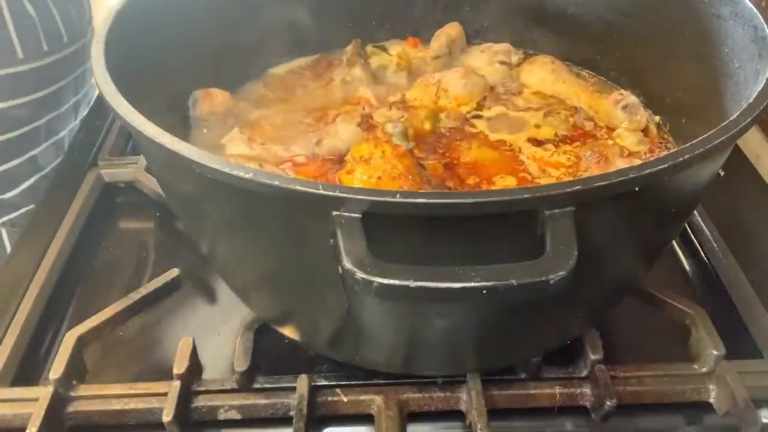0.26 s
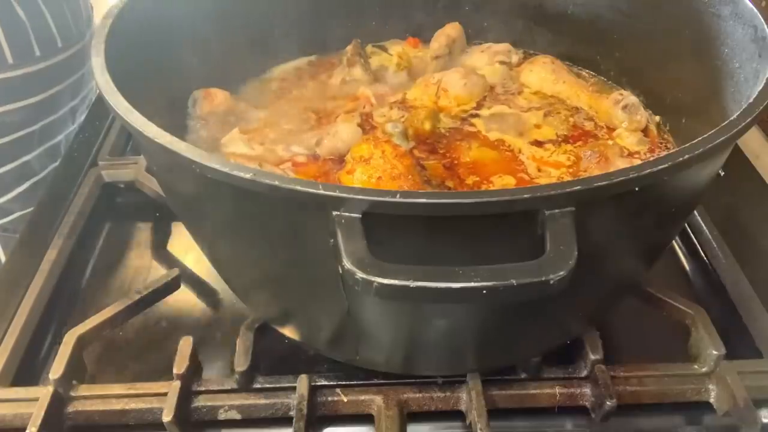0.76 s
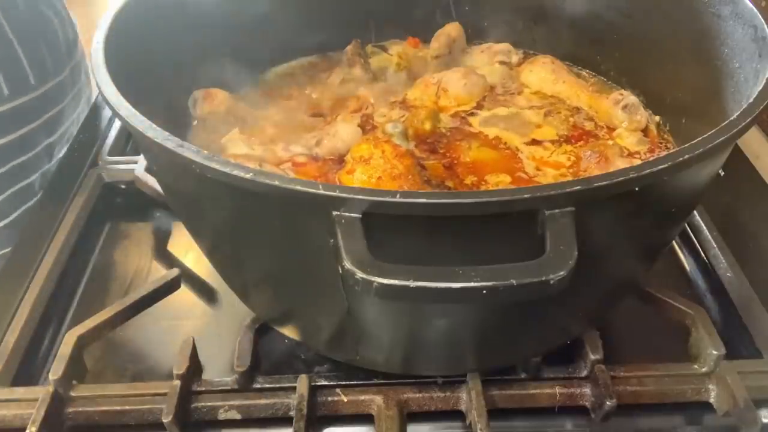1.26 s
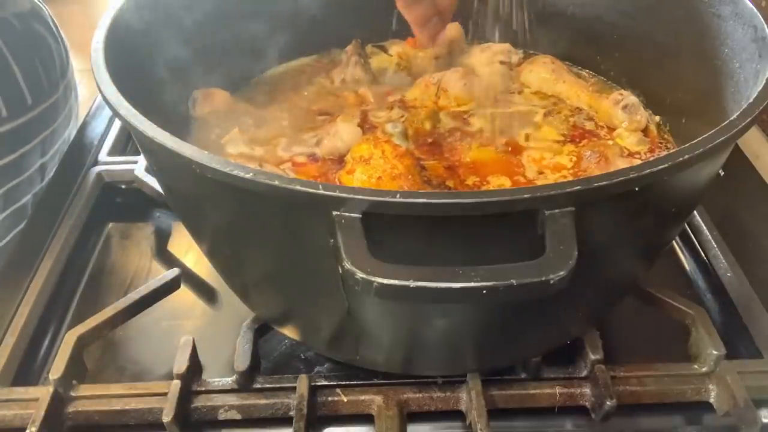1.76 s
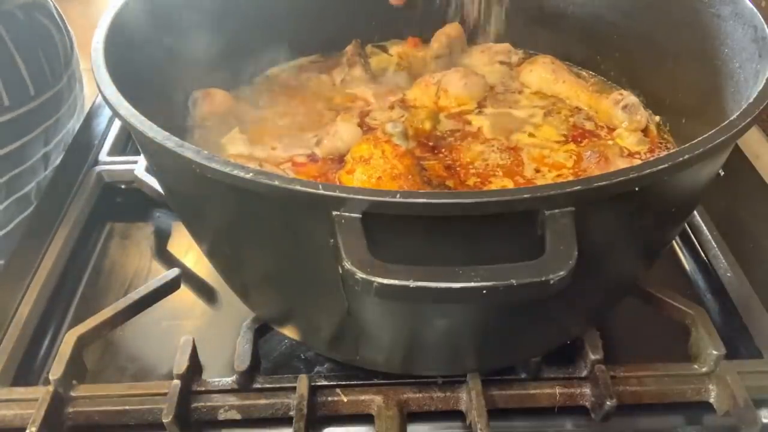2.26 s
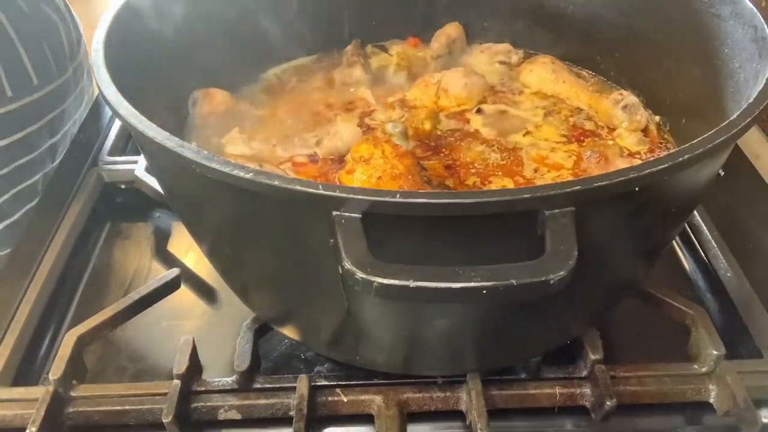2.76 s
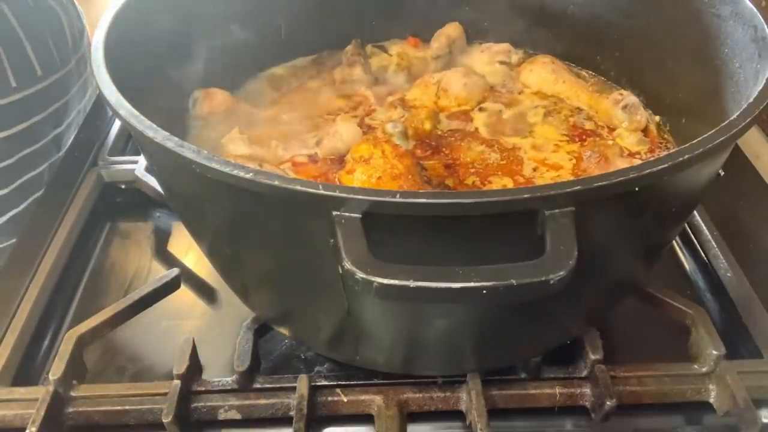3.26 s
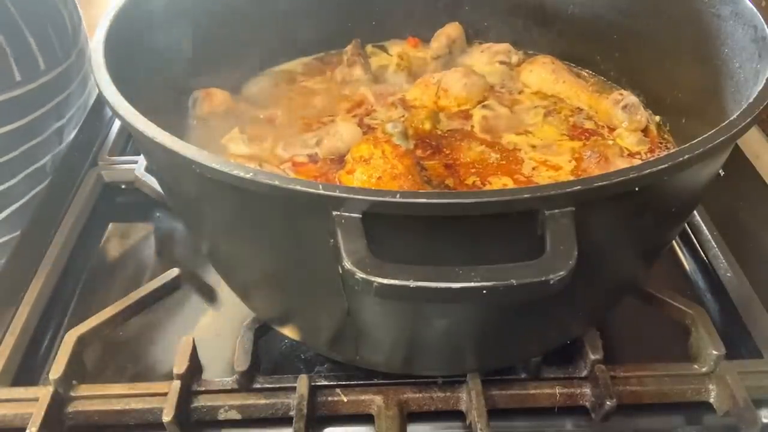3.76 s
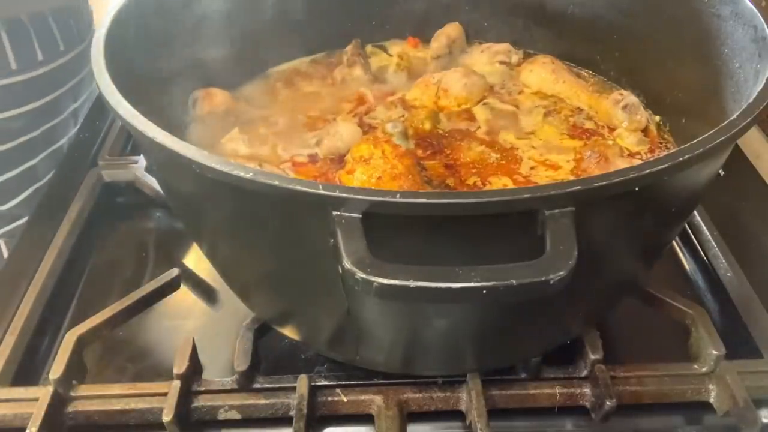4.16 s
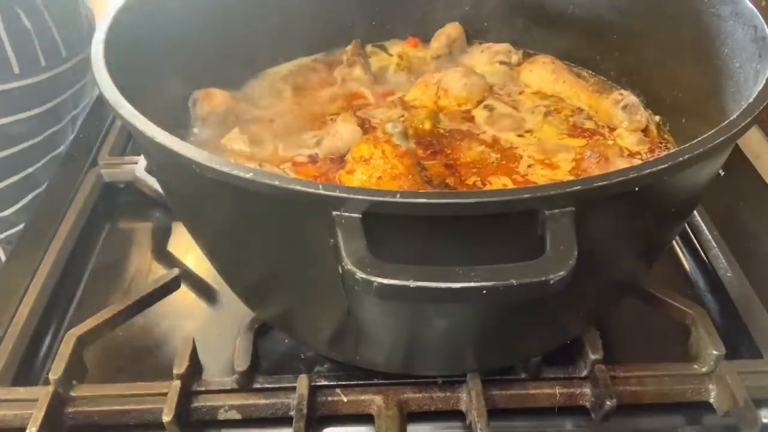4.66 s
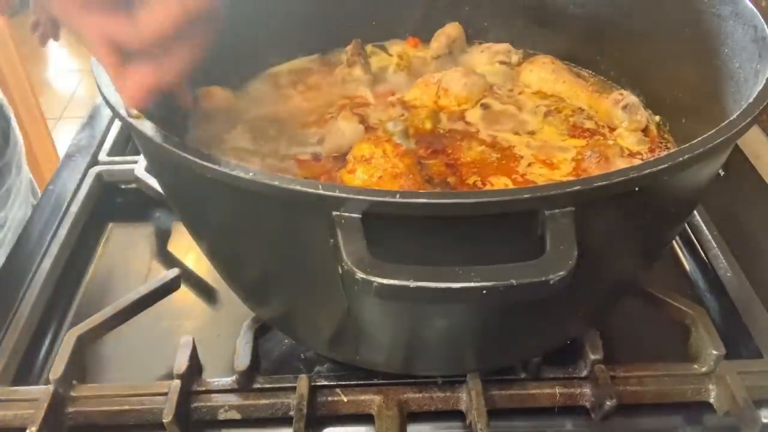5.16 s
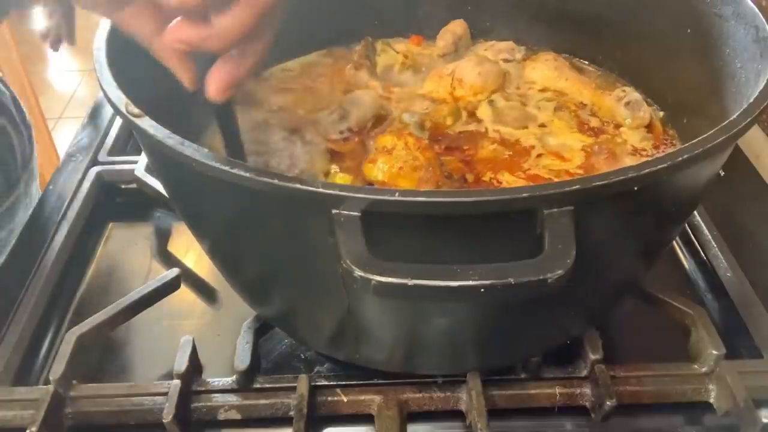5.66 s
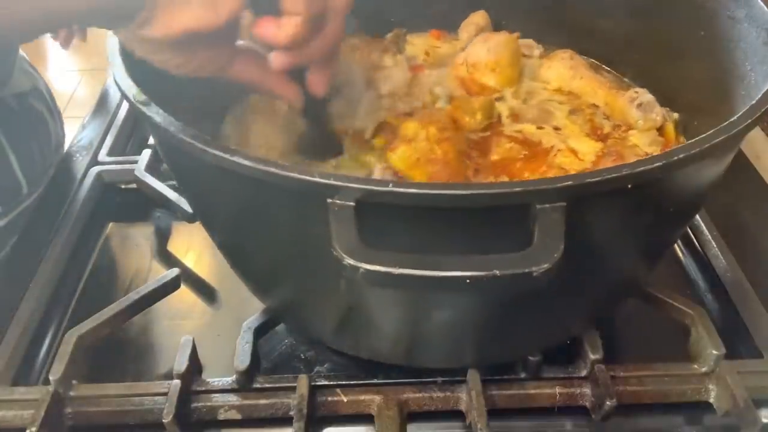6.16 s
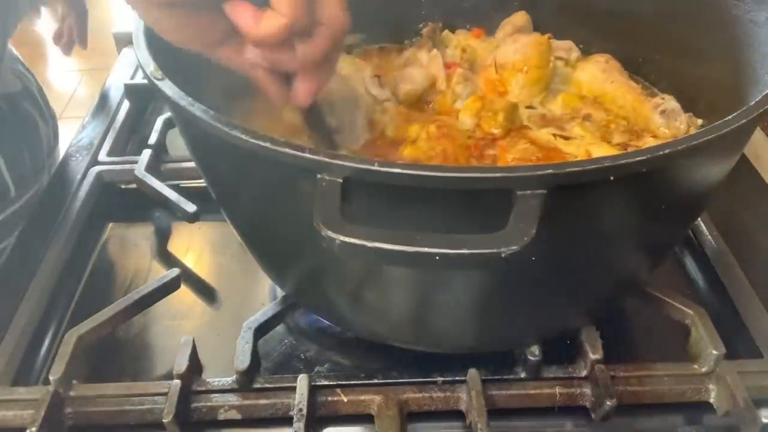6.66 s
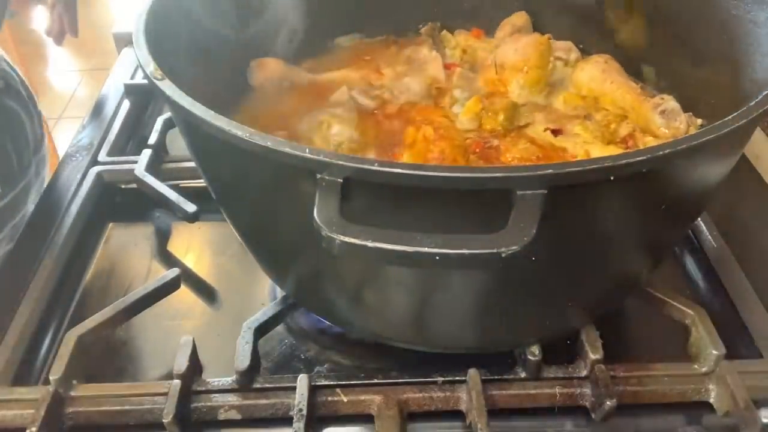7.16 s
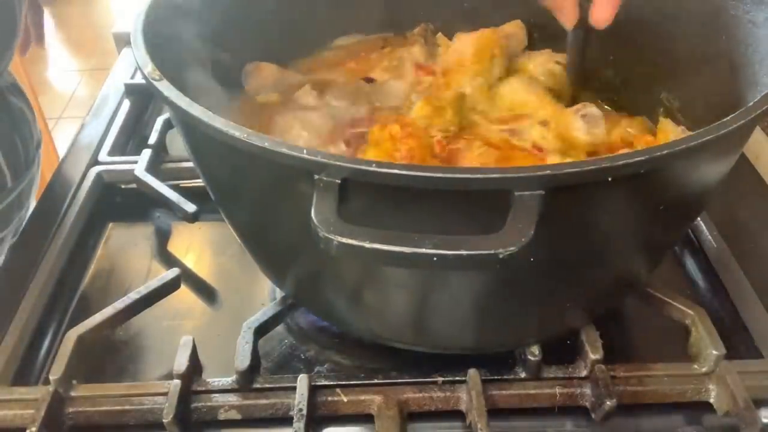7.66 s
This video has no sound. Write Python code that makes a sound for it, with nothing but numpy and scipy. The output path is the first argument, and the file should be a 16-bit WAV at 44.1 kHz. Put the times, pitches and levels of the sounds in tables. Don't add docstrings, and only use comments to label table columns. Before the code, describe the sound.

A close stereo view of a pot of chicken stew on a gas burner in a small kitchen with short echoes. Throughout, gas hisses finely and the flame roars softly and evenly, over low room rumble and a wavering low motor hum. Tiny bubbles crackle faintly, with larger round pops near 0.3, 1.2, 2.2, 3.1 and a busier group from 3.9 to 4.8 s. A very faint tap comes at 0.14 s. At 4.08-4.17 s something is set down: a rapid run of hard contacts, a brief counter ring, a low thump and a rustle. Faint rim ticks come at 5.2 s. From 6.0 s the heavy pot is nudged with low thuds, the handle ticks, and a dull scrape runs 6.15-6.45 s as the noise swells slightly. The sharpest, loudest knock hits at 6.59 s, quickly damped. Small light taps follow at 7.37, 7.48, 7.55 and 7.63 s while the simmer continues.

```python
import sys
import numpy as np
from scipy import signal
from scipy.fft import rfft, irfft
from scipy.io import wavfile
from scipy.ndimage import uniform_filter1d

SR = 44100
rng = np.random.default_rng(int(sys.argv[2]) if len(sys.argv) > 2 else 0)


def generate_wav(sig):
    pcm = np.round(np.clip(np.atleast_2d(sig).T, -1, 1) * 32767).astype(np.int16)
    wavfile.write(sys.argv[1], SR, pcm)


def rack_gain(trim_db):
    fader = np.asarray(trim_db, float)
    return 10 ** (fader / 20)


N = 348831

EDGE_HZ = 15730
COUNTER_LAG_MS, POT_LAG_MS, RIM_LAG_MS = 0.082, 0.27, 0.06


def evened(x):
    return x / np.sqrt(np.mean(abs(x) ** 2) + 1e-20)


def read(points, hz, order=1):
    points = np.array(points)
    return np.interp(np.log(hz + 1), np.log(points[:, 0] + 1), points[:, order])


def add(mix, s, sound):
    part = mix[max(round(s * SR), 0):][:len(sound)]
    part += sound[:len(part)]


def place(mix, s, sound, pan_db, lag_ms):
    add(mix[0], s + lag_ms / 1000, sound * rack_gain(pan_db / 2))
    add(mix[1], s, sound * rack_gain(-pan_db / 2))


def drift(t, top_hz):
    waves = [np.sin(2 * np.pi * (f * t + rng.random())) / np.sqrt(f) for f in np.geomspace(.3, top_hz, 24)]
    return evened(sum(waves))


# f/Hz, in-phase share (leans left), quarter-turn share (arrival lag)
LINK = [(40, .25, -0.1), (125, -0.56, 0.31), (215, 0.054, 0.083), (302, 0.66, -0.38), (400, -0.052, -0.17),
        (620, -0.1, -0.55), (930, -0.11, -0.68), (1260, -0.35, -0.082), (1500, -0.22, 0.0052),
        (1700, -0.61, -0.025), (2120, -.25, 0.63), (2500, -0.27, .15), (3060, -0.15, 0), (3620, -0.52, -.5),
        (4300, -0.14, 0.33), (5200, .1, 0.46), (6000, -0.12, -.1), (7000, .4, 0.47), (7300, .1, 0.91),
        (8500, 0, 0), (9900, 0.12, 0), (10700, 0, -.6), (13000, 0, -0.54)]
# f/Hz, width/Hz, mid lift/dB, side lift/dB
HOLLOWS = [(980.6, 22, 10, 1), (1554, 43, 5, 4), (1724, 35, 6, 4), (2720, 67, 1.5, 7), (292.5, 49, -5, 1),
           (3633, 31, 11, 5), (3670, 64, 2, 6), (3823, 39, 9, 5), (3890, 90, -4, 1), (4320, 80, 5.5, 7),
           (2185, 22, 5, 3), (2850, 27, 4.5, 2), (6100, 59, 6, -4), (4950, 210, 3.5, 4),
           (5880, 100, 4.5, 2), (7100, 120, -1, -5), (7185, 165, 6, 3.5), (8650, 120, 0, 3),
           (9150, 210, 9, -2), (5500, 100, -5.5, 0), (5330, 200, 2.5, 0), (5750, 120, 2, 0),
           (9900, 250, 6, 1), (10230, 120, -4, 1), (6285, 50, 6, 0), (6930, 90, 4, 0),
           (13210, 170, 4.5, -1), (13560, 200, -4, 0), (13800, 130, 6, 0), (11540, 68, 6.5, -8),
           (14500, 100, 2, 0)]
# f/Hz, mid change/dB
SHIFTED = [(5000, 0), (5500, -1), (6000, 0), (7400, 0), (8100, 3.5), (8600, 0), (10000, 2.5), (10300, -3),
           (10550, -9), (10850, -7.5), (11250, 2), (11600, 0)]
SHIFT_S = (6.1, 6.4)
STIR_S, STIR_WIDTH_S = 6.2, 0.21


def steady(layer, control, follow, stir_db, size, patchy_db, flicker_db):
    mid, side, mid_db, side_db = layer
    hop = size // 4
    hz = np.fft.rfftfreq(size, 1 / SR)
    t = np.arange(N // hop + 5) * hop / SR
    a, b, c, d, patches = rng.standard_normal((len(t), len(hz), 5)).T
    shared, separate = a + 1j * b, c + 1j * d

    patches = uniform_filter1d(patches, 8, 0)
    patches = evened(uniform_filter1d(patches, 10, 1))
    flow = follow * np.interp(t, *np.transpose(control))
    flow = flow + stir_db * np.exp(-((t - STIR_S) / STIR_WIDTH_S) ** 2)
    field = rack_gain(patchy_db * patches + flicker_db * drift(t, 27) + flow - flow.mean())

    lift = sum(np.outer(db, 1 / (1 + (2 * (hz - f) / width) ** 2)) for f, width, *db in HOLLOWS)
    shift = np.outer(read(SHIFTED, hz), np.interp(t, SHIFT_S, [0, 1]))
    mid_gain = rack_gain((read(mid, hz) + lift[0])[:, None] + shift)
    side_gain = rack_gain(read(side, hz) + lift[1])[:, None]

    link = (read(LINK, hz) + 1j * read(LINK, hz, order=2))[:, None]
    tied = link * shared + np.sqrt(np.clip(1 - abs(link) ** 2, 0, 1)) * separate
    inside = ((hz > mid[0][0]) & (hz < mid[-1][0]))[:, None]
    z = inside * field * [mid_gain * shared, side_gain * tied]
    m, s = signal.istft(z, nperseg=size, noverlap=size - hop)[1][:, :N]
    m, s = rack_gain(mid_db) * evened(m), rack_gain(side_db) * evened(s)
    return np.array([m + s, m - s])


# mid curve (f/Hz, level/dB per Hz), side curve (the same), mid rms/dB, side rms/dB
RUMBLE = [(15, -26), (25, -9), (49, -2.5), (75, -15), (113, -4.5), (146, -10.5), (177, -5), (228, -18.5),
          (269, -5.5), (286, -6), (301, -6), (313, -5.5), (325, -27), (369, -15.5), (520, -26), (680, -34),
          (1140, -120)], [(15, -40), (25, -39), (102, -5), (144, -9), (219, -6), (269, -17), (294, -1),
          (325, -7.5), (520, -11), (680, -54), (1140, -120)], -45.5, -56
# t/s, level/dB
DRAUGHT = [(0.0, -49), (0.75, -48), (3.92, -47.5), (4.14, -47), (4.58, -46.5), (5.76, -48), (6.07, -48.5),
           (6.23, -47), (6.49, -46), (6.69, -50), (7.17, -48), (7.9, -43)]


def rumble():
    return steady(RUMBLE, DRAUGHT, follow=0.44, stir_db=0.5, size=4096, patchy_db=1.0, flicker_db=-0.5)


# mid curve (f/Hz, level/dB per Hz), side curve (the same), mid rms/dB, side rms/dB
ROAR = [(260, -3), (450, -15), (623, -2.5), (705, -2), (863, -0.5), (1070, -3.5), (1270, -4), (1680, 0.5),
        (1810, -3.5), (2120, -3.5), (3070, -10.5), (3440, -8.5), (3680, -6.5), (4030, -13.5), (6600, -16.5),
        (8580, -62), (14500, -120)], [(260, -45), (450, -8), (576, -7), (638, 2), (854, -5.5), (988, 4),
        (1200, -8), (1640, 0.5), (1770, -8), (2070, -1), (2460, -6.5), (3040, -10), (3720, -7.5),
        (4450, -15), (6600, -5.5), (8580, -28), (14500, -120)], -51, -51
# t/s, level/dB
FLAME = [
    (0.0, -48.5),
    (2.27, -49),
    (3.23, -48.5),
    (5.26, -48.5),
    (6.4, -49),
    (7.9, -48.5),
]


def flame_roar():
    return steady(ROAR, FLAME, follow=1.0, stir_db=-0.1, size=2048, patchy_db=1.68, flicker_db=0.0)


# mid curve (f/Hz, level/dB per Hz), side curve (the same), mid rms/dB, side rms/dB
JET = [(3710, -43), (6300, -12), (7050, -9), (7350, -8.5), (7700, -18.5), (7950, -26.5), (8510, -23),
       (8640, -62), (9270, -63), (9410, -42), (9590, -32.5), (10600, -5.5), (11900, -9.5), (13400, 3),
       (15100, -2.5), (15800, -7)], [(3710, -50), (6300, -24), (6600, -15), (7110, -2.5), (7470, 2.5),
       (7850, -12), (8180, -3), (8510, -3), (8920, 3.5), (9310, 2), (10100, -2.5), (12600, -9),
       (13400, -13), (13600, -27), (14000, -29)], -48.5, -50


def jet_hiss():
    return steady(JET, FLAME, follow=1, stir_db=0, size=1024, patchy_db=1.7, flicker_db=.35)


# f/Hz, rms level/dB, left-right/dB, waver/dB
HUMS = [
    (299.2, -50, 3.5, -1.17),
    (43.6, -58, 6, 2.5),
    (200.8, -64.5, -1, 1.5),
]


def hum():
    t, out = np.arange(N) / SR, np.zeros((2, N))
    coarse = t[::200]
    for hz, db, pan_db, waver_db in HUMS:
        turns = hz * t + np.interp(t, coarse, 0.051 * drift(coarse, 3))
        level = np.sqrt(2) * rack_gain(db + waver_db * np.interp(t, coarse, drift(coarse, 2.9)))
        out[0] += level * rack_gain(pan_db / 2) * np.sin(2 * np.pi * turns - .35)
        out[1] += level * rack_gain(-pan_db / 2) * np.sin(2 * np.pi * turns + 0.23)
    return out


def bubble(hz, t60, rise):
    t = np.arange(round(t60 * SR)) / SR
    tone = np.sin(2 * np.pi * hz * t * (1 + rise * t / t60))
    return tone * rack_gain(-60 * t / t60) * (1 - np.exp(-t / 0.00096))


# t/s, peak level/dB, f/Hz
POPS = [(0.235, -37, 1660), (0.304, -39, 995), (1.212, -42, 765), (1.232, -36.5, 850), (1.259, -45, 865),
        (2.012, -47, 982), (2.234, -41, 1590), (3.052, -43, 1000), (3.102, -36, 930), (3.12, -35.5, 970),
        (3.487, -39, 984), (3.723, -37, 1700), (3.941, -41, 710), (4.046, -38, 885), (4.401, -39.5, 904),
        (4.414, -37, 1650), (4.449, -40, 1560), (4.544, -43, 830), (4.584, -33.5, 840), (4.679, -40, 950),
        (4.797, -38.5, 840), (6.374, -40, 830)]
POP_T60_S, POP_PAN_DB, POP_PAN_DB_PER_OCTAVE = 0.039, -3, 1
FAINT_POPS = 320


def simmer():
    out = np.zeros((2, N))
    for s, db, hz in POPS:
        pan_db = POP_PAN_DB + POP_PAN_DB_PER_OCTAVE * np.log2(hz / 1000)
        place(out, s, rack_gain(db) * bubble(hz, POP_T60_S, 0.058), pan_db, 0.21)
    for when, pitch, size, side in rng.random((FAINT_POPS, 4)):
        hz = 650 * 3.2 ** pitch
        level = rack_gain(-54.5 - 4.7 * np.log(np.maximum(size, .1)))
        place(out, when * N / SR, level * bubble(hz, 35 / hz, 0.15), -6 * side, 0.5 * side)
    return out


# t/s, rms level/dB, length/s, centre f/Hz, left-right/dB
BRUSHES = [(0.13, -51, 0.037, 4100, 7), (3.603, -49, 0.087, 4700, 0), (4.086, -40, 0.035, 3400, 2),
           (4.10, -47, 0.06, 800, 4), (6.588, -52, 0.11, 1800, 2), (6.586, -45, .07, 3500, 0),
           (4.115, -46, .085, 1300, 0), (6.147, -55, .06, 2500, -2), (6.357, -48, 0.05, 1000, -4),
           (5.225, -50, .03, 2200, -5), (7.476, -48, .016, 4600, -3), (7.371, -34, .014, 21500, 0)]
BRUSH_SPREAD = 1.9


def brushes():
    out = np.zeros((2, N))
    for s, db, length, hz, pan_db in BRUSHES:
        edges = [hz / BRUSH_SPREAD, min(hz * BRUSH_SPREAD, EDGE_HZ)]
        band = signal.butter(2, edges, "band", fs=SR, output="sos")
        grain = rack_gain(6.0 * rng.standard_normal(6000))
        noise = rng.standard_normal((2, 6000)) * grain
        swish = evened(signal.sosfilt(band, noise))[:, :round(length * SR)]
        swish = swish * np.hanning(swish.shape[1]) * rack_gain(db + np.array([[.5], [-.5]]) * pan_db)
        add(out[0], s, swish[0])
        add(out[1], s, swish[1])
    return out


def struck(contacts, modes, crack_db, lag_ms):
    out, t = np.zeros((2, N)), np.arange(3500) / SR
    hz, mode_db, t60 = np.transpose(modes)[:, :, None]
    soft_start = 1 - np.exp(-t / 0.00028)
    for s, db, bright_db, pan_db in contacts:
        for port in range(2):
            phase = rng.random(hz.shape) * 2.0
            level = rack_gain(mode_db + bright_db * np.log2(hz / 2000) - 60 * t / t60)
            ring = (level * np.sin(2 * np.pi * hz * t + phase)).sum(0)
            crack = rack_gain(crack_db + 2 * bright_db - 60 * t / 0.049) * rng.standard_normal(len(t))
            knock = (ring / abs(ring).max() + crack) * soft_start
            add(out[port], s + (1 - port) * lag_ms / 1000, rack_gain(db + (-1.5 - port) * pan_db) * knock)
    return out


# t/s, peak level/dB, brightness/dB per octave, left-right/dB
SPOON = [(6.5828, -33, 2, -2), (6.5863, -16, 1, -2), (6.5881, -16.5, 0, -2.5), (6.5901, -20, -2, -3),
         (6.5926, -23, -4, 1), (6.5995, -29, 0, -2), (6.6121, -31, 1, -2), (.1371, -36, 3, -3),
         (5.2881, -41, -2, -2), (7.3738, -31, -2, -2), (7.4821, -35, 4, -2), (7.5481, -33, -2, -3),
         (7.6281, -36, 0, -2)]
# f/Hz, level/dB, t60/s
WALL = [(600, -10, .025), (958, -3, .03), (1255, 2, .03), (1560, -11, .02), (2170, -14, .04),
        (2895, 0, .016), (3200, -6, .012), (3490, 0, .014), (3735, -3, .03), (4250, -6, .014),
        (4673, -5, .03), (5200, -9, .02), (6400, -11, .025), (7100, -13, .016), (11500, -15, .01)]


def spoon_taps():
    return struck(SPOON, WALL, -17.0, POT_LAG_MS)


# t/s, peak level/dB, f/Hz, glide factor
PUSHES = [(.24, -38, 170, 0.88), (1.782, -39, 64.6, 1), (3.97, -40.5, 70.5, 1.05),
          (4.075, -37.5, 69.6, 1.1), (4.094, -27.5, 183, 0.84), (4.875, -41, 376, 0.87),
          (4.905, -43, 260, 1), (4.94, -42, 330, 0.83), (5.59, -41, 181, 1.16), (6.015, -28.5, 62.4, 2.03),
          (6.08, -32, 90.6, 1.27), (6.143, -40, 60, 1.2), (6.17, -43, 250, 1), (6.3, -41, 248, 0.86),
          (6.35, -43, 200, 1.1), (6.408, -27.5, 68.5, 0.95), (6.48, -39, 70.5, 0.94),
          (6.575, -34, 64.7, 0.98), (6.588, -32.5, 149, 1.1), (6.607, -38, 60, 0.93),
          (6.62, -37, 140, 1.08), (7.55, -45, 400, 0.68), (7.79, -41, 400, 0.79), (7.81, -38.5, 182, 0.88)]
PUSH_TURNS, PUSH_LEAST_S = 4.9, 0.019


def pushes():
    out = np.zeros(N)
    for s, db, hz, glide in PUSHES:
        length = max(PUSH_TURNS / (hz * np.sqrt(glide)), PUSH_LEAST_S)
        u = np.linspace(0, 1, round(length * SR))
        sway = np.sin(2 * np.pi * np.cumsum(hz * glide ** u) / SR)
        add(out, s, rack_gain(db) * np.sin(np.pi * u) ** 2 * sway)
    return out * rack_gain([[-.8], [.8]]) 


# t/s, peak level/dB, brightness/dB per octave, left-right/dB
SET_DOWN = [(4.0801, -21, 0.5, -1.5), (4.0853, -21, -3.5, -2), (4.0885, -25.5, -1.5, -1.5),
            (4.0918, -19, 1, -1.5), (4.0930, -30, 12, 2), (4.1003, -23.5, -2, -2), (4.1055, -23, 6, -1),
            (4.1105, -21, 2, 2), (4.119, -39, 5, 3), (4.141, -38, 4, -1), (4.129, -36, -2, 1),
            (4.152, -39, 0, 0), (4.168, -37, 0, 0), (4.180, -38, 2, 4)]
# f/Hz, level/dB, t60/s
COUNTER = [(565, -3.5, 0.017), (906, 1, 0.088), (1007, 0.5, 0.079), (1132, -1, 0.082), (1311, -3.5, 0.084),
           (1650, -12, 0.05), (2030, -9.5, 0.04), (2510, -11, 0.019), (2970, -10.5, 0.052),
           (3600, -13, 0.022), (4530, -9, 0.015), (5060, -5, 0.015), (5630, -10, 0.018), (7030, -22, 0.017)]


def set_down():
    return struck(SET_DOWN, COUNTER, -49, COUNTER_LAG_MS)


# t/s, peak level/dB, brightness/dB per octave, left-right/dB
HANDLE = [
    (6.1580, -36, -12, -4),
    (6.1741, -43, 5, -4),
    (6.1871, -38.5, 0, -4),
    (5.1966, -36.5, 2, -4),
    (5.2371, -41, 3, -4),
]
# f/Hz, level/dB, t60/s
SHAFT = [(1930, -1, 0.022), (2560, -9, 0.02), (2900, -6, 0.018), (3480, -9, .016)]


def handle_ticks():
    return struck(HANDLE, SHAFT, -39, RIM_LAG_MS)


# t/s, peak level/dB, length/ms, left-right/dB
SNAPS = [
    (6.5900, -16.5, .38, -11),
    (6.5880, -22, .34, -5),
    (7.3733, -27, .45, -3),
    (7.482, -36, .22, -3),
    (7.548, -31, .5, -4),
    (5.198, -37, .4, -4),
    (7.628, -35, .33, -4),
    (7.835, -37, .6, -5),
]


def snaps():
    out = np.zeros((2, N))
    for s, db, length_ms, pan_db in SNAPS:
        u = (np.arange(-80, 80) / SR * 1000 / length_ms * np.pi) ** 2
        place(out, s - 80 / SR, -rack_gain(db) * (1 - 2 * u) * np.exp(-u), pan_db, POT_LAG_MS)
    return out


# t/s, level/dB, f/Hz
SCRAPE = [
    (6.14, -51, 330),
    (6.19, -45.5, 378),
    (6.24, -63, 356),
    (6.29, -48, 417),
    (6.35, -45, 400),
    (6.41, -46, 364),
    (6.44, -55, 340),
]


def scrape():
    s, db, hz = np.transpose(SCRAPE)
    t = np.arange(s[0], s[-1], 1 / SR)
    turn = np.exp(2j * np.pi * np.cumsum(np.interp(t, s, hz)) / SR)
    r = np.exp(-np.pi * 220 / SR)
    rub = rng.standard_normal(len(t)) / turn
    for _ in range(2):
        rub = signal.lfilter([1 - r], [1, -r], rub)
    rub = evened((turn * rub).real)
    out = np.zeros((2, N))
    place(out, s[0], rack_gain(np.interp(t, s, db)) * rub * signal.windows.tukey(len(t), .2), -4.5, 0.81)
    return out


# f/Hz, t60/s
KITCHEN = [(250, 0.36), (1000, 0.12), (4000, 0.12), (10000, 0.077)]


def kitchen(x):
    taps = np.zeros((2, SR // 2))
    starts = np.arange(200, SR // 2 - 20, 20)
    at = starts + rng.integers(0, 20, (2, len(starts)))
    np.put_along_axis(taps, at, rng.choice([-1., 1.], at.shape), 1)
    hz, t, z = signal.stft(taps, SR, nperseg=256)
    decay = rack_gain(-60 * t / read(KITCHEN, hz)[:, None])
    tail = signal.istft(z * decay, SR, nperseg=256)[1]
    return signal.fftconvolve(x, tail / np.linalg.norm(tail[0]), axes=1)[:, :N]


# f/Hz, mid level/dB, side level/dB
PORTS = [(7150, 1, 0.5), (8200, -10, 2), (8400, -40, 2), (8850, -40, 1), (9250, -3, 0), (9400, -6, 0),
         (9500, -20, 0), (10000, -12, 0), (10800, -5, 0), (12500, -5, -6), (13500, -9, -30),
         (15600, -9, -60), (16000, -60, -60)]


def ports(x):
    hz = np.fft.rfftfreq(N, 1 / SR)
    left, right = rfft(x)
    m = (left + right) / 2 * rack_gain(read(PORTS, hz))
    s = (left - right) / 2 * rack_gain(read(PORTS, hz, order=2))
    return irfft(np.array([m + s, m - s]), N)


def scene():
    bed = rumble() + flame_roar() + jet_hiss() + hum()
    small = simmer() + brushes() + scrape()
    knocks = spoon_taps() + set_down() + handle_ticks() + snaps()
    echoes = kitchen(rack_gain(-7.5) * knocks + rack_gain(-10.0) * small)
    return bed + pushes() + ports(small + knocks + echoes)


def top_cut(x):
    return signal.sosfilt(signal.butter(12, 15990, fs=SR, output="sos"), x)


def record(dry):
    low_cut = signal.butter(6, 37, "high", fs=SR, output="sos")
    side_cut = signal.butter(2, 45, "high", fs=SR, output="sos")
    m = dry.mean(0)
    s = signal.sosfiltfilt(side_cut, (dry[0] - dry[1]) / 2)
    cut = signal.sosfiltfilt(low_cut, [m + s, m - s])
    band_limit = signal.firwin(1023, EDGE_HZ, window=("kaiser", 9), fs=SR)
    mix = signal.oaconvolve(cut, band_limit[None], "same")
    return top_cut(mix)


dry = scene()
out = record(dry)
generate_wav(out)
```